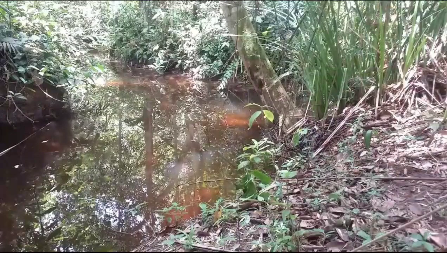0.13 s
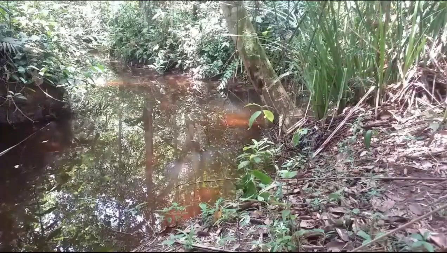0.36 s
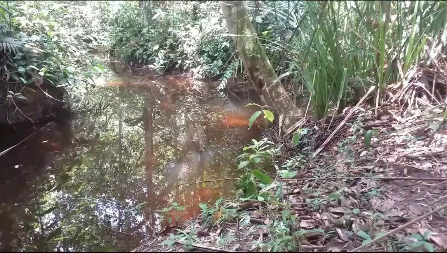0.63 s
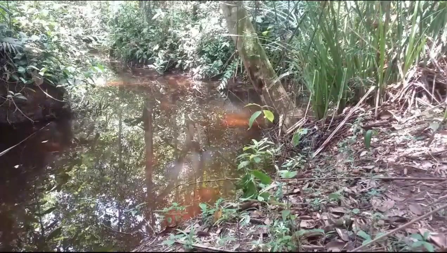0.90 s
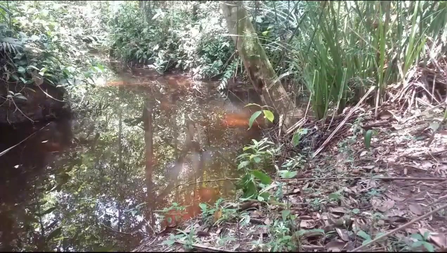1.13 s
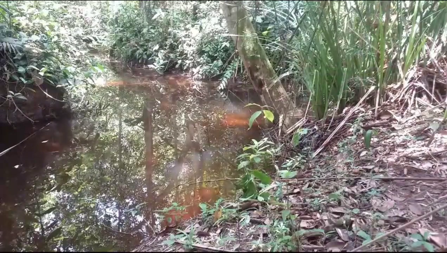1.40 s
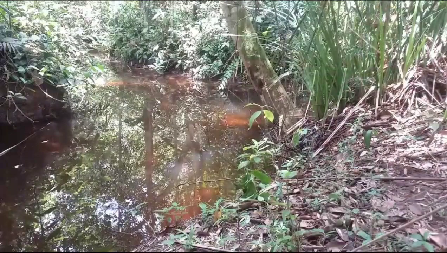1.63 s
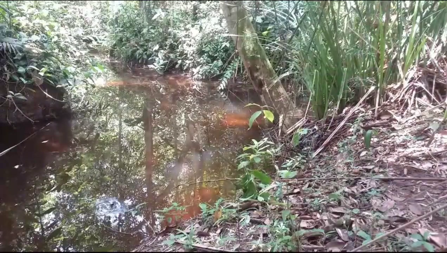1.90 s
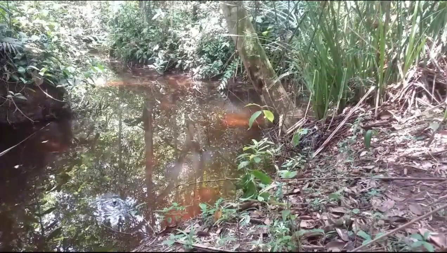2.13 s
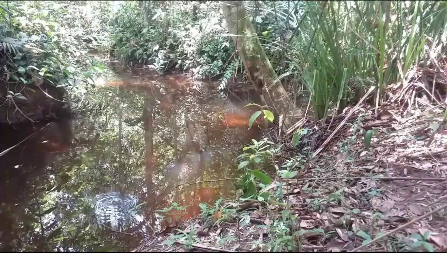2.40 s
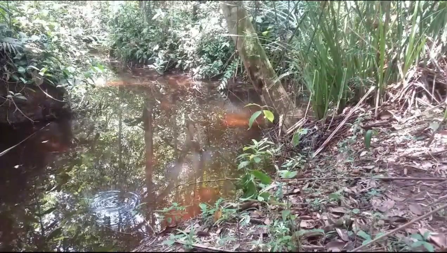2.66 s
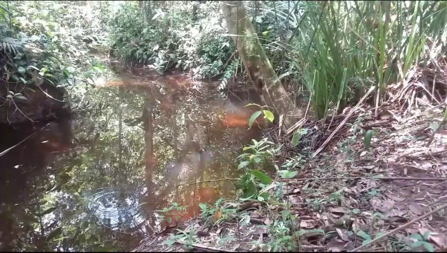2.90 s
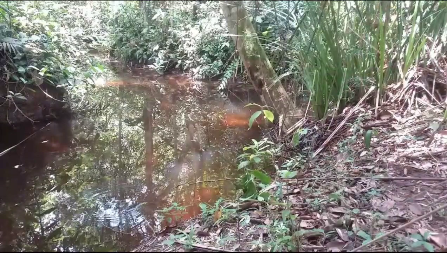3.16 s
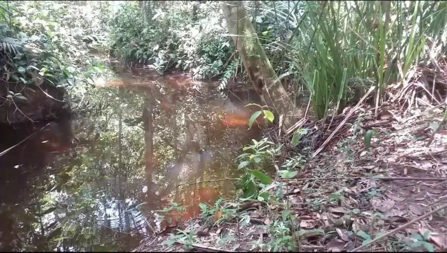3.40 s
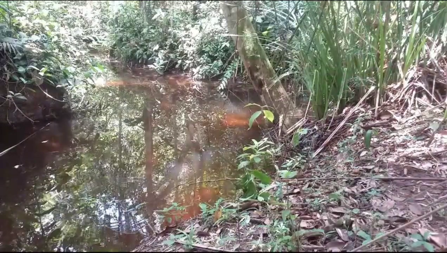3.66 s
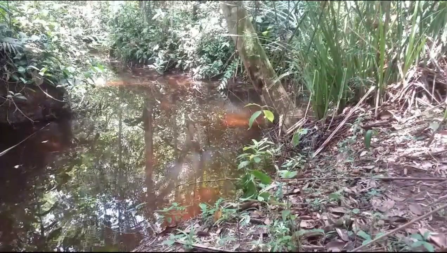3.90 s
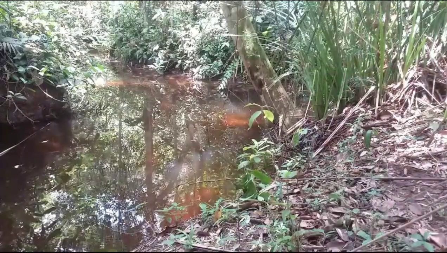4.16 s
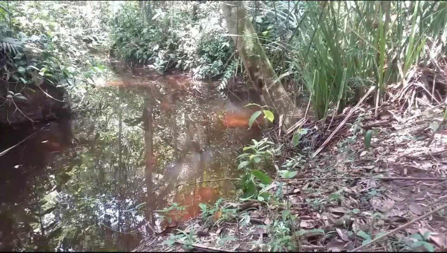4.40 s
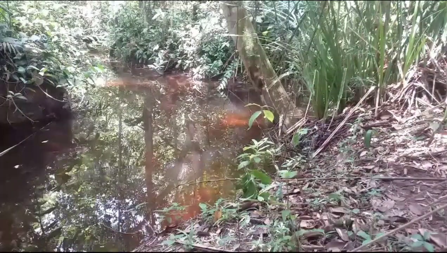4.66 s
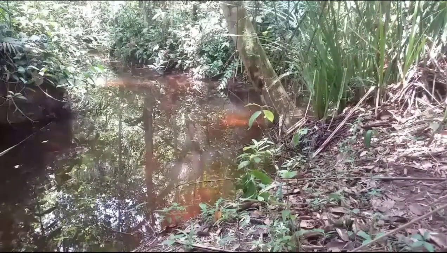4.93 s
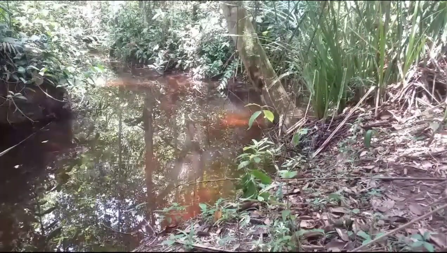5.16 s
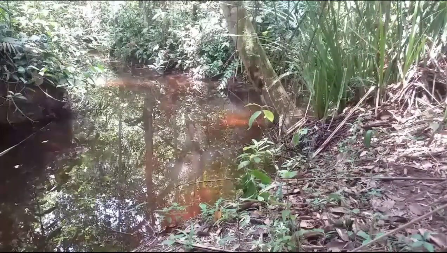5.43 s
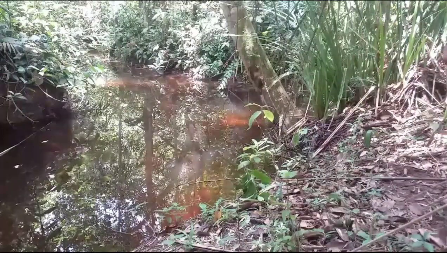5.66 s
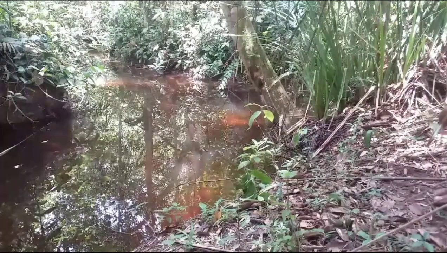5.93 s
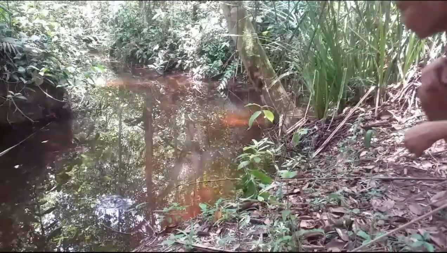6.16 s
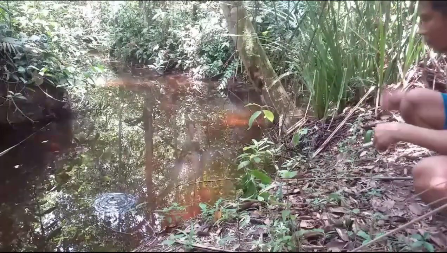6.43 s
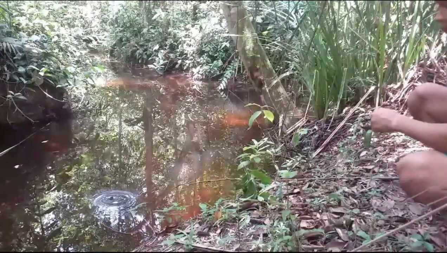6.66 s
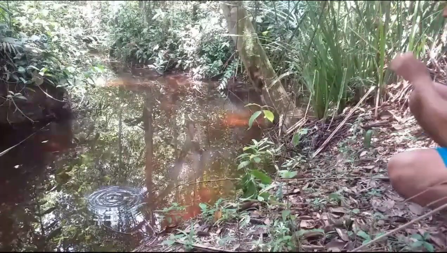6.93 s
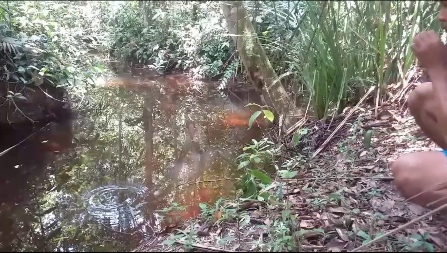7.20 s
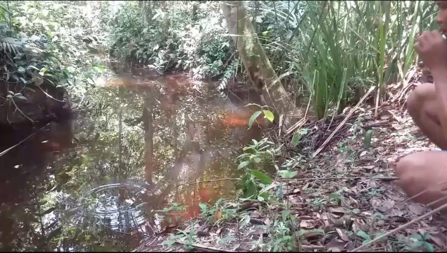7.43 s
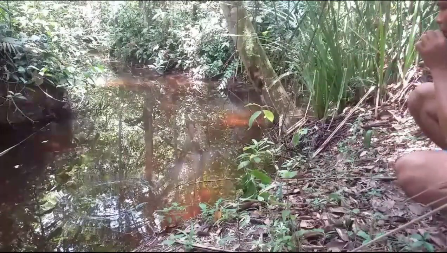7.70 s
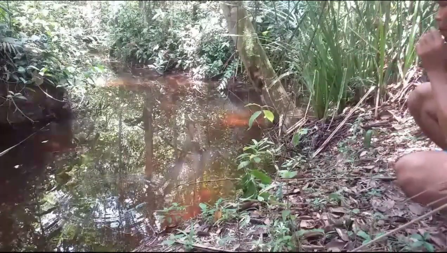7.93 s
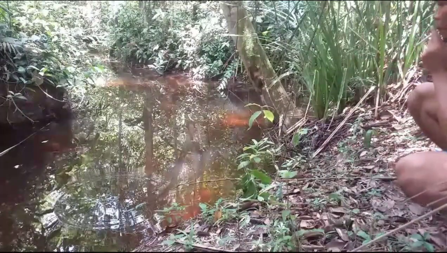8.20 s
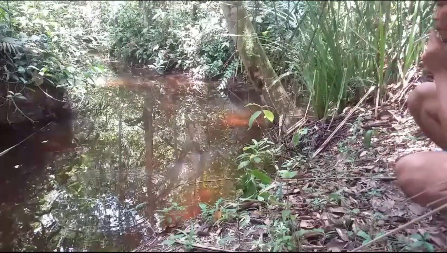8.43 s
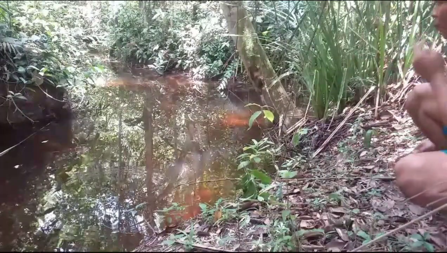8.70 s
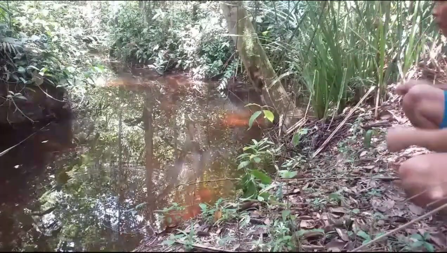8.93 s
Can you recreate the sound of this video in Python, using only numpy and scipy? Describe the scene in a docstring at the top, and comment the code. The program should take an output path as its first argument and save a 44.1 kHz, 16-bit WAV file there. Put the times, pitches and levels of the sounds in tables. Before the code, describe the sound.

Outdoors in a forest beside still water, a close mono microphone hears a dense, steady cicada chorus around 7 kHz, with a fainter, higher shrill throbbing about twenty times a second. Under it lie soft low air and a very faint distant engine drone. From 0.26 to 1.1 s a far frog gives a quick run of ringing chucks, while small twigs tick at 0.5, 0.8, 1.1 and 1.3 s. At 1.7 s a very loud cluster of twig snaps bursts out with leaf rustle and short woody knocks, echoing briefly. A quieter gap follows. From 3.35 to 3.8 s comes a long, bright, brittle crackle, with faint hoarser frog chucks; the cicadas drop, stay low until about 4.9 s, then recover. A sharp tick at 4.7 s, a soft low thud at 4.9 s and small rustles lead to 6.3 s. Afterwards the chorus continues with thin, faint distant whistles until 9 s.

```python
"""Cicadas sing steadily in a forest by still water: tymbal clicks ring a chorus band and a throbbing shrill.
Far off, a frog chucks in ringing pulses, an engine drones in sines and thin whistles come from filtered noise.
Close to a mono microphone someone shifts on dry litter: twigs snap as noise bursts, leaves rustle as dense
crackles, ground and wood thud as fading rings. During a long crackle the background of cicadas, forest air
and quiet stir is turned down from the crackle's start; it stays low for over a second, then recovers."""
import sys
import numpy as np
from scipy import signal
from scipy.fft import rfft, irfft
from scipy.io import wavfile
from scipy.ndimage import uniform_filter1d

SR = 44100
rng = np.random.default_rng(int(sys.argv[2]) if len(sys.argv) > 2 else 0)


def to_linear_factor(level_db):
    """Convert decibel levels (scalar or array-like) to linear amplitude factors."""
    exponent = np.asarray(level_db, float) / 20
    return 10 ** exponent


def unload_audio(sound):
    """Save the sound as a 16-bit wav file, at the path given as the first command line argument."""
    columns = np.transpose(np.atleast_2d(sound))
    # keep every value between -1 and 1, then stretch to whole-number steps
    steps = np.round(np.clip(columns, -1, 1) * 32767)
    wavfile.write(sys.argv[1], SR, steps.astype(np.int16))


N = 399987
T = np.arange(N) / SR

# Gain of the background (cicadas, air and the litter's stir), turned down from the start of a long crackle
# and then let recover. Each row: time in seconds, gain in dB.
DIP = [(3.33, -2), (3.46, -4), (3.8, -13.5), (4.0, -14), (4.4, -15), (4.9, -11.5), (5.12, -5), (5.35, -3),
       (6.4, -1)]

# Throb of the nearest cicada. Each row: time in seconds, throbs per second in Hz, depth from 0 to 1.
THROB = [(0, 20.4, 0.36), (3.3, 20.4, 0.1), (5, 19.35, 0.4), (7.6, 19.35, 0.32), (8, 19.35, 0.1),
         (8.4, 17, 0.14), (8.6, 19.35, 0.4), (9.07, 19.35, 0.31)]
# Where the throb stands at one moment. The pair: time in seconds, position in turns.
THROB_ANCHOR = (7, .45)
# The two buzzes in each throb. Each row: position in turns, strength as a ratio.
BUZZES = [(-.03, 1.), (0.181, 0.91)]
# Groups of cicadas. Each row: centre in Hz, width in Hz, relative density in dB per Hz.
SINGER_GROUPS = [(5000, 410, -22), (5550, 300, -19.5), (6084, 250, -10), (6475, 370, -5), (6860, 230, -1.5),
                 (7203, 315, -1.5), (7560, 330, -3), (8105, 220, -11.5), (8480, 75, -16.5), (8420, 50, -16)]
# Spectrum of the shrill overtone. Each row: frequency in Hz, relative density in dB per Hz.
SHRILL_SPECTRUM = [(10500, -30.5), (11500, -28), (12600, -15), (13200, -7), (13650, 3.5), (13900, -1.5),
                   (14300, 4.5), (14850, 2), (15100, -0.5), (15550, -6)]
# Shrill level ahead of flicker, throb and dip. Each row: time in seconds, level in dB.
SHRILL_LEVEL = [(0, -57), (.7, -57.5), (1.8, -60.5), (2.9, -58), (4.4, -58.5), (6.5, -56.5), (7.6, -55.5),
                (8.35, -51.5), (8.45, -57), (9.07, -56)]

# Spectrum of the far forest's air. Each row: frequency in Hz, relative density in dB per Hz.
AIR_SPECTRUM = [(18, -40), (30, -22.5), (59, -4), (91, -2), (167, -7), (200, -8), (381, -19.5),
                (583, -17.5), (800, -21.5), (1040, -52.5), (1760, -120)]

# The distant engine. Each row: time in seconds, half the firing rate in Hz, then the levels of
# the even orders, the third order and the higher odd orders, all in dB.
ENGINE = [(0.0, 39.8, -65.5, -76, -80), (4.29, 39.23, -78.5, -94.5, -95),
          (6.21, 40.15, -65.5, -87.5, -75.5), (7.35, 35.63, -73, -80.5, -80), (7.85, 38.84, -86, -83, -88),
          (8.11, 35.6, -68.5, -81, -81.5), (8.56, 38.4, -67, -71, -64), (9.07, 38.5, -73, -74.5, -76)]
# Balance of the engine's orders. Each row: multiple of half the firing rate, gain in dB.
ENGINE_ORDERS = [(2, -2), (3, 6.5), (4, -8), (5, -1.5), (6, -12.5), (7, -5)]

# Far birds and crickets. Each row: start in seconds, end in seconds, pitch in Hz, width in Hz, level in dB.
WHISTLES = [(0, .12, 2780, 38, -63), (2.35, 2.8, 4900, 160, -87), (4.146, 4.45, 11550, 26, -83.5),
            (6.458, 6.8, 2886, 30, -72.5), (7.098, 7.243, 2030, 74.2, -79), (7.3, 8.25, 5010, 130, -72.5),
            (2.204, 3.306, 778, 31, -83), (7.703, 7.812, 1180, 41, -72), (8.5, 8.68, 3350, 300, -67.5),
            (8.96, 9.072, 3470, 11, -68)]

# Spectra of the litter. Each row: frequency in Hz, relative density in dB per Hz.
LEAVES = [(1300, -30.5), (2000, -4), (3700, -1), (4600, 2), (6000, -2), (8000, 1)]
LEAF_TOPS = [(6000, -14), (8500, -4), (10400, -8), (13000, 4), (15500, -6)]
SOIL = [(200, 3), (450, 1), (1200, 1.5), (2000, -4), (3000, -32)]
# Quiet stir of the litter ahead of the dip. Each row: time in seconds, leaves in dB, leaf tops in dB.
STIR = [(0, -74.5, -74), (.3, -73.5, -73.5), (.9, -67, -73), (1.6, -69, -73), (2.1, -69.5, -69.5),
        (2.3, -82, -77.5), (3.0, -73, -76.5), (4.0, -66.5, -66.5), (4.4, -71.5, -73.5), (4.7, -63.5, -71.5),
        (5.1, -76.5, -73), (5.5, -65.5, -71.5), (6.05, -69, -69.5), (6.17, -77, -73), (6.35, -72, -74),
        (7.1, -79, -77), (8.2, -78, -69.5), (8.5, -75.5, -73.5), (9.07, -76, -73.5)]
# Scuffs on the litter. Each row: start in seconds, length in seconds, leaves in dB,
# leaf tops in dB against the leaves, soil in dB against the leaves.
SCUFFS = [(.9, 0.057, -68.5, -6, -5), (1.279, 0.0084, -61, -4, 1.5), (1.605, 0.066, -54, -12, -6),
          (1.69, 0.054, -48.5, -7, -10), (1.708, .115, -49, -8, -11), (1.85, 0.022, -55.5, -15, -14),
          (1.889, 0.012, -57.5, -11, -10), (1.915, 0.0084, -62.5, -3, -2), (2.8, 0.063, -63.5, -10, -13),
          (2.929, 0.037, -64.5, -9, -9), (3.09, 0.042, -66.5, -4, -19), (3.145, .19, -62.5, -8.5, -16),
          (3.345, 0.083, -50.5, 0.5, -11.5), (3.541, 0.01, -54.5, 2, -11), (3.625, .02, -59, -4, -7),
          (3.75, 0.019, -66, -7, -12.5), (4.465, 0.029, -65, -8, -7), (4.559, 0.11, -70.5, -5, -11),
          (5.152, 0.023, -62, -11, -22), (5.201, 0.061, -60, -9, -4.5), (5.39, 0.012, -69, -15, -8),
          (5.669, .03, -61.5, -9, -5), (5.7, 0.044, -53.5, -11, -9.5), (5.78, 0.039, -61, -9, -9),
          (6.034, 0.024, -65, -9, -8)]

# Frog calls. Each row: start in seconds, relative level in dB.
CHUCKS = [(0.2624, -46), (0.3082, -44), (0.3681, -45), (0.4304, -41), (0.4868, -43), (0.5407, -42),
          (0.6594, -47), (0.7302, -46), (0.7981, -47), (0.8664, -45), (0.9283, -45), (0.9946, -47),
          (1.0555, -47), (1.1179, -46), (3.2839, -48), (3.5029, -47), (3.5693, -48), (3.6925, -52),
          (3.8137, -56), (3.8721, -54), (3.9305, -58), (3.9434, -57), (3.9963, -58)]
# Ringing of the vocal sac. Each row: multiple of the pitch, level in dB, t60 in seconds.
FROG_MODES = [(1, 0, .018), (1.17, -8, .012), (.88, -9, .012), (1.95, -8, .026), (2.09, -8, .014)]
# The pitch sags late in the first call; the second starts lower, rises and is hoarser.
# Each row: time in seconds, pitch in Hz, scatter of the pulses' pitch from 0 to 1.
FROG_PITCH = [(.26, 2470, .012), (.87, 2470, .012), (1.12, 2400, .015), (3.3, 2300, .06), (4, 2420, .07)]

# Knocks on ground and wood. Each row: start in seconds, relative level in dB, pitch in Hz, t60 in seconds.
THUDS = [(.32, -45.5, 65, 0.092), (1.61, -47.5, 129.7, 0.12), (1.71, -27.5, 480, 0.016),
         (1.742, -29.5, 550, 0.038), (1.746, -39, 203, 0.048), (3.351, -47, 107, 0.14),
         (3.355, -50, 403, 0.042), (4.475, -54.5, 110, .08), (4.698, -33, 2710, 0.013),
         (4.896, -35.5, 94.5, 0.12)]

# Breaking twigs. Each row: start in seconds, level in dB, centre in Hz,
# bass in dB against the level, treble in dB against the level.
SNAPS = [(0.5208, -36, 4800, -33, -18), (0.7994, -35, 7500, -12, 4), (1.1038, -28, 6500, -21, -8),
         (1.2851, -31, 6500, -13, -1), (1.6156, -41, 4800, -8, -8), (1.622, -39, 6500, -5, -3),
         (1.6995, -26, 5600, -16, -8), (1.7083, -32, 7500, -7, -5), (1.7116, -13, 6500, -11, -5),
         (1.7147, -20, 5600, -4, -2), (1.7227, -16, 5600, -6, -7), (1.7297, -27, 7500, -10, -1),
         (1.7409, -6, 6500, -15, -4), (1.7449, -18, 4100, -3, 0), (1.751, -6, 7500, -10, -1),
         (1.7542, -11, 6500, -15, -8), (1.7646, -15, 6500, -19, -4), (1.8915, -32, 7500, -12, -7),
         (1.9231, -31, 7500, -8, 5), (2.9566, -41, 6500, -18, 1), (3.1659, -41, 3500, -19, -15),
         (3.1856, -42, 4800, -15, -4), (3.216, -39, 3500, -14, -10), (3.3471, -22, 7500, -7, -1),
         (3.3507, -16, 5600, -18, 3), (3.362, -26, 7500, -22, 6), (3.3697, -18, 7500, -20, 2),
         (3.3785, -19, 7500, -23, 10), (3.3867, -24, 7500, -16, 4), (3.3941, -17, 7500, -22, 2),
         (3.3984, -21, 7500, -20, 4), (3.4026, -26, 7500, -17, 8), (3.4253, -23, 7500, -10, 7),
         (3.4364, -35, 7500, -12, 8), (3.5255, -38, 7500, -24, 9), (3.5437, -27, 7500, -13, 6),
         (3.5467, -24, 4800, -15, -2), (3.6249, -17, 4800, -23, 1), (3.6398, -27, 7500, -20, 13),
         (3.6622, -42, 7500, -14, 12), (3.6862, -31, 7500, -18, 12), (3.7124, -33, 7500, -15, 11),
         (3.743, -44, 4100, -16, 5), (3.7529, -34, 7500, -13, 13), (3.7604, -33, 3500, -13, 6),
         (3.7681, -25, 7500, -14, 11), (3.771, -28, 7500, -14, 8), (4.091, -47, 6500, -21, 6),
         (4.1458, -55, 5600, -18, 7), (4.207, -48, 4100, -17, -15), (4.4688, -45, 4100, -14, -3),
         (4.4928, -47, 6500, -17, -14), (4.5985, -44, 5600, -20, -13), (4.6983, -29, 7500, -3, 8),
         (4.8859, -53, 3000, -3, -6), (5.152, -42, 4800, -9, -6), (5.2185, -32, 5600, -21, -17),
         (5.2595, -39, 6500, -9, -3), (5.3838, -38, 7500, -26, 3), (5.8488, -41, 6500, -34, 1),
         (6.0468, -39, 6500, -12, -5), (6.2867, -39, 6500, -25, -12)]


def curve(table):
    """Columns of a table, joined by straight lines in time."""
    s, *columns = np.transpose(table)
    return [np.interp(T, s, c) for c in columns]


def colour(x, points):
    """Give x a spectrum; rms 1."""
    hz, db = np.transpose(points)
    f = np.maximum(np.arange(len(x) // 2 + 1) * SR / len(x), 1)
    gain = to_linear_factor(np.interp(np.log(f), np.log(hz), db, left=-90, right=-90))
    y = irfft(rfft(x) * gain, len(x))
    return y / np.std(y)


def band(x, lo_hz, hi_hz, order=3):
    """Causal band-pass."""
    return signal.sosfilt(signal.butter(order, [lo_hz, hi_hz], "bandpass", fs=SR, output="sos"), x)


def share(points, lo_hz, hi_hz):
    """Gain that puts a level given for one band onto a whole spectrum."""
    return 1 / np.std(band(colour(rng.standard_normal(SR), points), lo_hz, hi_hz, order=6))


def clicks(per_s, scatter_db):
    """Clicks at random moments, a few much stronger than the rest."""
    fires, sign, strength = rng.random((3, N))
    return (fires < per_s / SR) * np.sign(sign - .5) * to_linear_factor(-scatter_db * np.log(1 - strength))


def walk(rate):
    """Random levels held 1 / rate seconds and slewed twice; spread 1."""
    k = int(SR / rate)
    held = np.repeat(rng.standard_normal(N // k + 1), k)
    w = uniform_filter1d(uniform_filter1d(held, k), k)[:N]
    return w / np.std(w)


def ring(hz, t60, count):
    """A fading sine, count samples long."""
    t = np.arange(count) / SR
    return np.sin(2 * np.pi * hz * t) * np.exp(-np.log(1000) * t / t60)


def add(out, s, sound):
    """Mix a short sound in at time s."""
    i = max(int(s * SR), 0)
    out[i:i + len(sound)] += sound[:N - i]


def singers():
    """Each group clicks its tymbals on its own and rings one band; the groups swell apart. Rms 1."""
    out = 0
    for hz, width, db in SINGER_GROUPS:
        group = band(clicks(2000, scatter_db=1.5), hz - width / 2, hz + width / 2, order=2)
        out = out + group / np.std(group) * np.sqrt(width) * to_linear_factor(db + 0.66 * walk(10))
    return out / np.std(out)


def cicadas(chorus_db, shrill_db):
    """Many tymbal clicks ring the chorus band; the nearest singer throbs and owns the shrill overtone."""
    rate, depth = curve(THROB)
    turns = np.cumsum(rate) / SR
    anchor_s, anchor_turns = THROB_ANCHOR
    turns += anchor_turns - turns[int(anchor_s * SR)]
    buzz = 0
    for at, strength in BUZZES:
        from_peak = (turns - at + .5) % 1 - .5
        buzz = buzz + strength * np.exp(-.5 * (from_peak / .045) ** 2)
    depth = np.clip(depth, 0, 1)
    near = np.sqrt(1 - depth + depth * buzz / buzz.mean())
    # its broad swell also shows in the main band, a little later
    swell = 1 + 0.089 * np.cos(2 * np.pi * (turns - .4))
    chorus = singers() * swell * to_linear_factor(chorus_db)
    overtone = colour(clicks(8000, scatter_db=1.0), SHRILL_SPECTRUM)
    flicker_db = .6 * walk(18)
    shrill = overtone * near * to_linear_factor(shrill_db + flicker_db)
    return chorus + shrill


def air():
    """The far forest is hiss whose half-octave bands flicker on their own."""
    hiss, out = colour(rng.standard_normal(N), AIR_SPECTRUM), 0
    for hz in 30 * 2 ** np.arange(0, 5.5, .5):
        out = out + band(hiss, hz, hz * np.sqrt(2), order=2) * to_linear_factor(1.7 * walk(5.5))
    return out * to_linear_factor(-61)


def engine():
    """A distant two-cylinder drone; odd orders come from the uneven cylinders, and the air makes each waver."""
    hz, even_db, third_db, odd_db = curve(ENGINE)
    phase = 2 * np.pi * np.cumsum(hz) / SR
    out = 0
    for order, db in ENGINE_ORDERS:
        order = round(order)
        if order == 3:
            level_db = third_db
        else:
            level_db = odd_db if order % 2 else even_db
        gain = np.sqrt(2) * to_linear_factor(db + level_db + 2.5 * walk(8.3))
        out = out + gain * np.sin(order * phase + 1.3 * walk(5.3))
    return out


def whistles():
    """Thin, faint notes of narrow noise, blurred by distance."""
    out = 0
    for start, end, hz, width, db in WHISTLES:
        note = band(rng.standard_normal(N), hz - width / 2, hz + width / 2, order=1)
        gate = np.clip(np.minimum((T - start) / .025, (end - T) / .08), 0, 1)
        out = out + to_linear_factor(db) * gate * note / np.std(note)
    return out


def rustle(dip_db):
    """Dry litter gives dense small crackles; each scuff swells quickly, holds and dies away over a quiet stir."""
    rise_share, t60_s, stir_soil_db = .25, .14, -78  # share of a scuff's length spent swelling; its fade
    leaves_db, tops_db = curve(STIR)
    stir_power = to_linear_factor(np.array([leaves_db, tops_db, stir_soil_db + 0 * T]) + dip_db) ** 2
    scuff_power = np.zeros((3, N))
    for s, length, db, top_db, soil_db in SCUFFS:
        rise = np.clip((T - s) / (rise_share * length), 0, 1)
        fade_db = -60 * np.maximum(T - s - length, 0) / t60_s
        balance = to_linear_factor(np.array([[0], [top_db], [soil_db]])) ** 2
        scuff_power += rise * to_linear_factor(db + fade_db) ** 2 * balance
    grains = clicks(1300, scatter_db=2.5)
    grains = grains / np.std(grains)
    # scuffs are grainy and uneven, the stir between them is smoother
    crackle = grains * to_linear_factor(3 * walk(60))
    stir = .6 * grains + .8 * rng.standard_normal(N)
    # each spectrum with the band in Hz to which its levels apply
    layers = [(LEAVES, 3100, 4300), (LEAF_TOPS, 9500, 11300), (SOIL, 700, 1800)]
    out = 0
    for (points, lo, hi), scuffing, stirring in zip(layers, scuff_power, stir_power):
        litter = colour(crackle, points) * np.sqrt(scuffing) + colour(stir, points) * np.sqrt(stirring)
        out = out + share(points, lo, hi) * litter
    return out


def frog():
    """Each chuck is three quick fading throat pulses ringing the vocal sac; water and banks blur its end."""
    out = np.zeros(N)
    onset = 1 - np.exp(-np.arange(1024) / SR / .0009)
    pitch_hz, pitch_scatter = curve(FROG_PITCH)
    for (s, db), chances in zip(CHUCKS, rng.standard_normal((len(CHUCKS), 3, 3))):
        i = int(s * SR)
        for k, (late, loud, sharp) in enumerate(chances):
            hz = pitch_hz[i] * (1 + pitch_scatter[i] * sharp)
            pulse = onset * sum(to_linear_factor(g) * ring(m * hz, t60, count=1024) for m, g, t60 in FROG_MODES)
            # pulses about 4.5 ms apart, later ones weaker
            add(out, s + k * .0045 * (1 + .12 * late), 2 * to_linear_factor(db - 2.5 * k ** 2 + loud) * pulse)
    out = band(out, 1900, 6000)
    t = np.arange(3000) / SR
    blur = rng.standard_normal(len(t)) * np.exp(-t / .025) * np.minimum(t / .008, 1)
    return out + to_linear_factor(-7) * signal.fftconvolve(out, blur / np.linalg.norm(blur))[:N]


def trees(x):
    """Trunks and banks scatter a sound back as a fading, duller wash."""
    t60_s, wash_db = 0.31, -29.5
    t = np.arange(int(.6 * SR)) / SR
    wash = colour(rng.standard_normal(len(t)), [(200, -4.5), (3000, -12.5), (9000, 3.0), (16000, -11.5)])
    wash *= np.exp(-np.log(1000) * t / t60_s) * np.minimum(t / 0.0044, 1)
    return x + to_linear_factor(wash_db) * signal.fftconvolve(x, wash / np.linalg.norm(wash))[:N]


def thuds():
    """Knocks on ground and wood: a ring with a lower and an upper neighbour, rising over half a cycle."""
    out, t = np.zeros(N), np.arange(8192) / SR
    for s, db, hz, t60 in THUDS:
        body = sum(g * ring(r * hz, t60, count=8192) for r, g in [(.6, 0.3), (1, 0.99), (1.45, .5)])
        add(out, s, to_linear_factor(db) * (1 - np.exp(-t * hz / 0.5)) * body)
    return out


def snaps():
    """A twig breaks: a sharp crack with milliseconds of splinters, strongest round a centre set by its size."""
    width = 1.25  # ratio either side of the centre
    out, t = np.zeros(N), np.arange(1024) / SR
    shape = np.exp(-t / .0004) + .16 * np.exp(-t / .004)
    for (s, db, hz, bass_db, treble_db), noise in zip(SNAPS, rng.standard_normal((len(SNAPS), len(t)))):
        crack = noise * shape + 4 * (t == 0)
        # centre, broad body, bass, treble: edges in Hz and peak in dB against the level
        layers = [(hz / width, hz * width, 0), (2300, 7500, 1),
                  (1400, 2900, bass_db), (8800, 16500, treble_db)]
        snap = 0
        for lo, hi, rel_db in layers:
            part = band(crack, lo, hi)
            peak = np.abs(signal.hilbert(part)).max()
            snap = snap + to_linear_factor(db + rel_db) * part / peak
        add(out, s, snap)
    return out


def scene():
    """Far sounds and litter cut off in the high treble, thuds, and snaps and frog with their echo; mono."""
    (dip_db,), (shrill_db,) = curve(DIP), curve(SHRILL_LEVEL)
    forest = (cicadas(-48, shrill_db) + air()) * to_linear_factor(dip_db)
    soft = forest + engine() + whistles() + rustle(dip_db)
    soft = signal.sosfilt(signal.ellip(10, .2, 60, 15600, fs=SR, output="sos"), soft)
    mono = soft + thuds() + trees(snaps() + frog())
    return np.array([mono, mono])


def top_cut(x):
    """Nothing passes above the cut-off."""
    return signal.sosfilt(signal.butter(12, 16810, fs=SR, output="sos"), x)


def record(dry):
    """The microphone drops the deepest bass."""
    mix = signal.sosfilt(signal.butter(2, 45, "highpass", fs=SR, output="sos"), dry)
    return top_cut(mix)


dry = scene()
out = record(dry)
unload_audio(out)
```